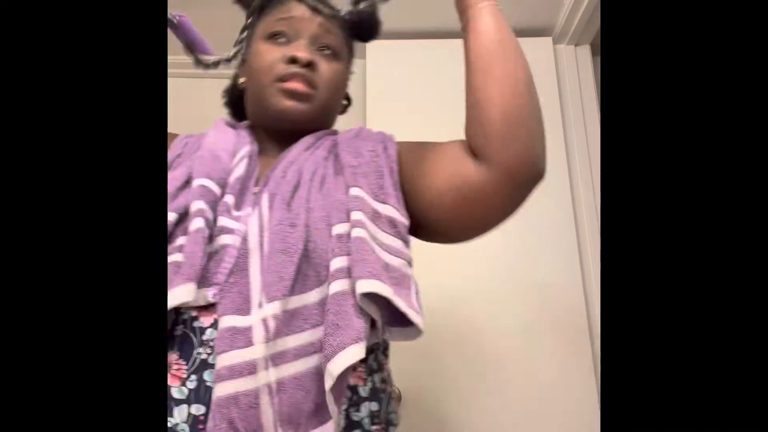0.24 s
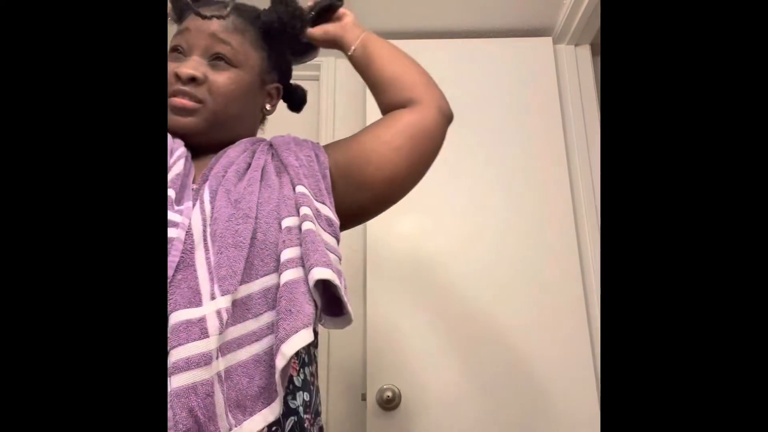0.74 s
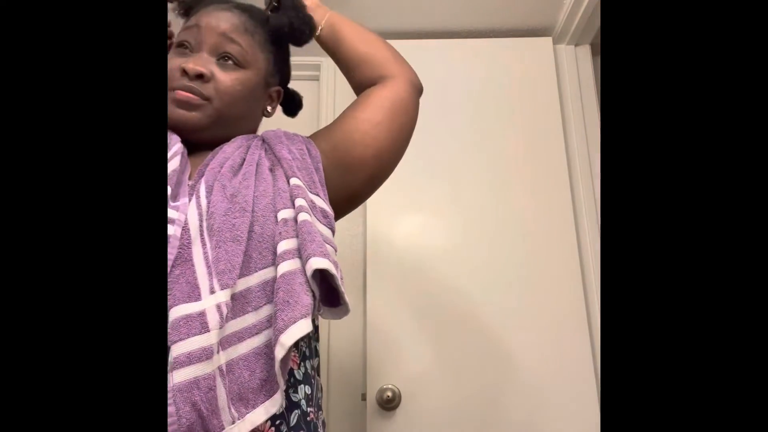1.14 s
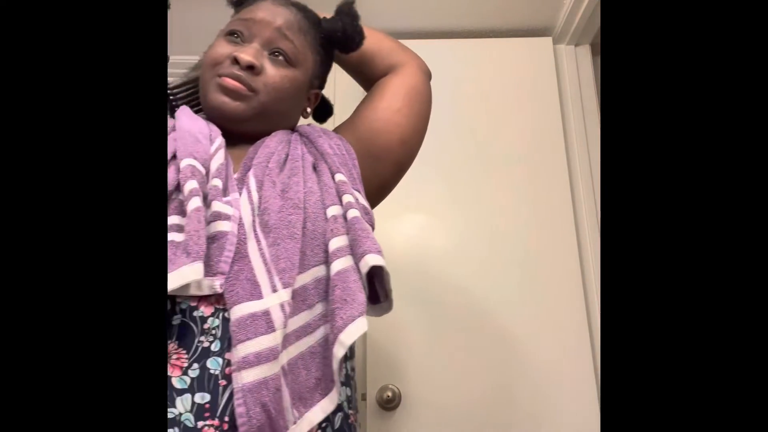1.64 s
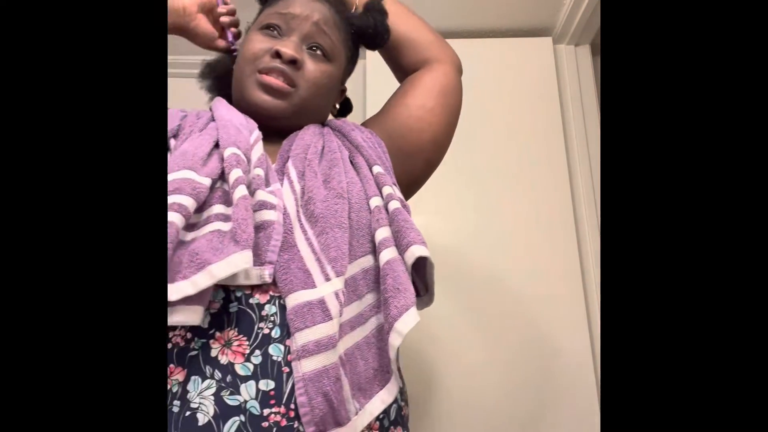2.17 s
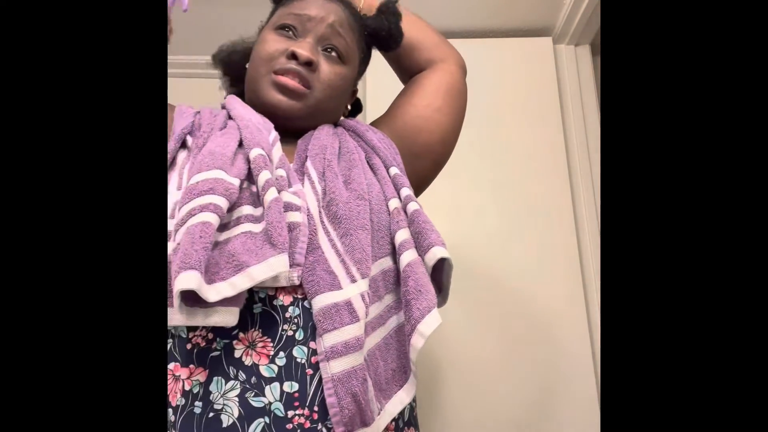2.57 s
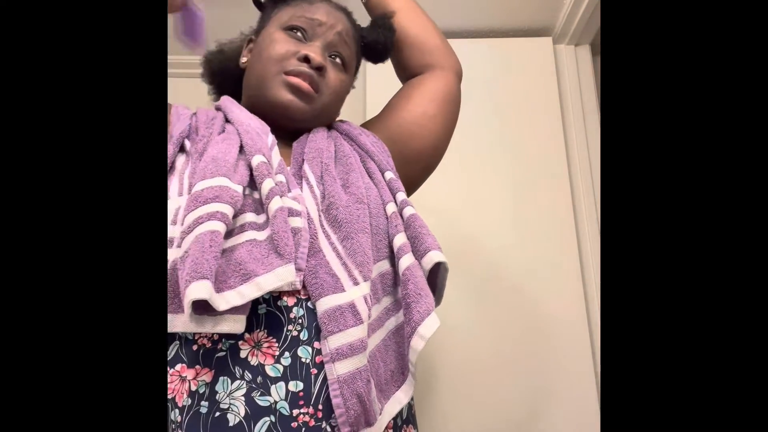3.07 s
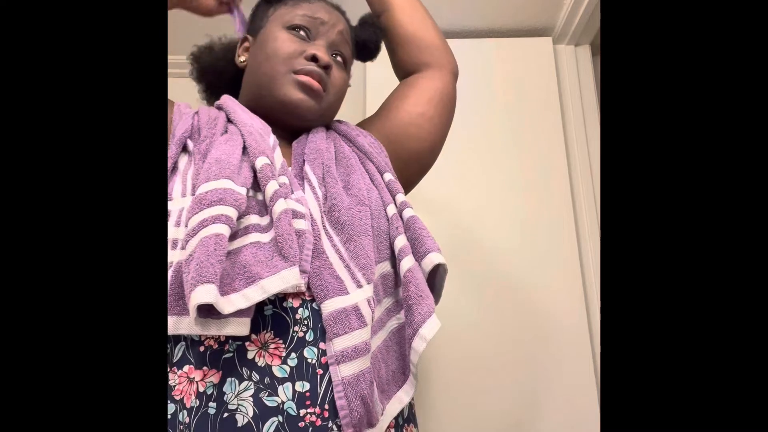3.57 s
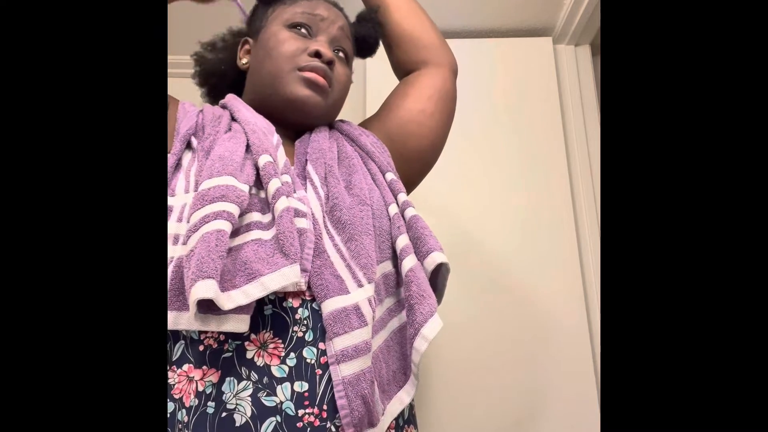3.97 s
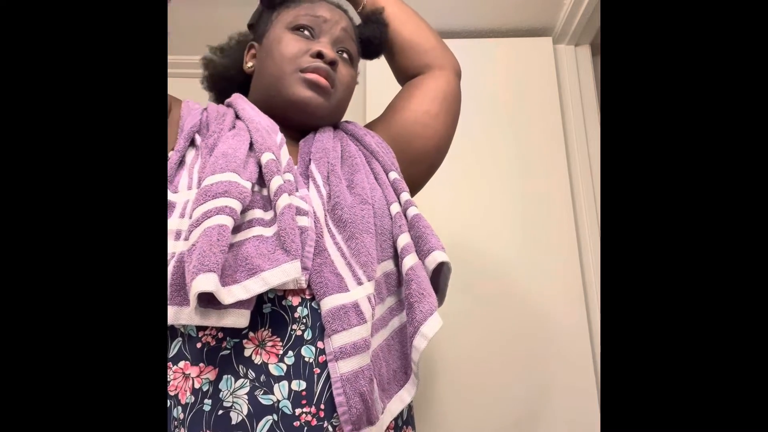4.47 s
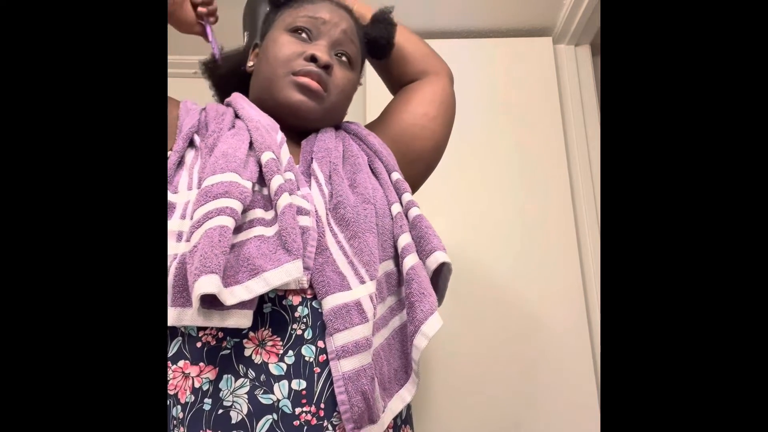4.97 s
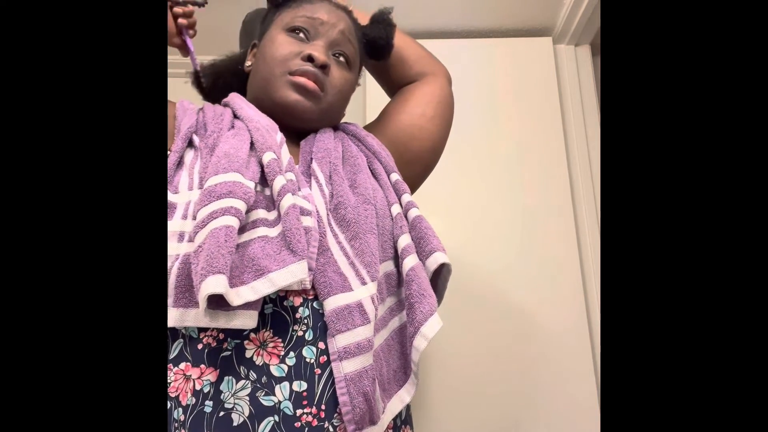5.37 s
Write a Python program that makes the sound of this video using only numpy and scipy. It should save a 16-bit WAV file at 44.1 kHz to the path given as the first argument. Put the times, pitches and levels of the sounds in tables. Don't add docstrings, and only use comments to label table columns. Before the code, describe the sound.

Close hair dryer noise opens with a loud near sweep, then rushing air and a wavering, near-constant-pitch whine ring off hard walls.

```python
import sys
import numpy as np
from scipy import signal
from scipy.fft import rfft, irfft, next_fast_len
from scipy.io import wavfile
from scipy.ndimage import uniform_filter1d, map_coordinates

SR = 44100
rng = np.random.default_rng(int(sys.argv[2]) if len(sys.argv) > 2 else 0)


def put_to_file(sound):
    columns = np.atleast_2d(sound).T
    safe = np.clip(columns, -1, 1)
    whole_steps = np.round(safe * 32767)
    wavfile.write(sys.argv[1], SR, whole_steps.astype(np.int16))


def ratio_of_db(decibels):
    return 10 ** (np.asarray(decibels, float) / 20)


N = 247842
M = next_fast_len(N + 8192)
HZ = np.fft.rfftfreq(M, 1 / SR)
SIDES = np.array([[1], [-1]])


def along(points):
    hz, value = np.transpose(points)
    return np.interp(np.log(HZ + 1), np.log(hz + 1), value)


def curves(rows):
    seconds, *columns = np.transpose(rows)
    return [np.interp(np.arange(N) / SR, seconds, column) for column in columns]


def wobble(rate):
    coarse = np.arange(0, N + 128, 128)
    knots = rng.standard_normal(int(N * rate / SR) + 4)
    return np.interp(np.arange(N), coarse, map_coordinates(knots, [coarse * rate / SR]))


def white():
    return rfft(rng.standard_normal(N), M) * np.sqrt(SR / 2)


def ringing(modes):
    ring = 0
    for k, (centre, width, left_db, right_db, lead) in enumerate(modes):
        port = ratio_of_db([[left_db], [right_db]]) * np.exp(.5j * SIDES * lead)
        resonance = 1j * HZ * width / (centre * centre - HZ * HZ + 1j * HZ * width)
        ring = ring + port * (-1) ** k * resonance
    return irfft(ring * white(), M)[:, :N]


def rush(spectrum):
    # (frequency [Hz], correlation [0-1])
    likeness = [(40, 0.99), (200, 1), (330, 0.71), (500, 1), (800, 0.19), (1150, 0.15), (1550, 0.35),
                (1750, 1), (2300, 0.8), (2700, 0.45), (3200, 0.12), (4500, 0.15), (5500, 1), (7300, 0.58),
                (8300, 1), (10200, 0.91), (11300, 0.64), (12600, 0.9)]
    # (frequency [Hz], left lead [rad])
    port_lead = [(250, 0), (480, -0.2), (650, -0.1), (1000, 1.5), (1450, -0.5), (1700, -1), (2200, -2.19),
                 (3000, -3), (4500, -4), (6200, -5.5), (7600, -2.5), (8400, -3.5), (10200, -3), (12300, -1),
                 (12700, 0.5)]
    # (frequency [Hz], left over right [dB])
    shading = [(200, 0), (330, 1.5), (500, 3), (900, 0), (1300, 5.5), (1800, 10.5), (2100, 4.5),
               (2400, 1.5), (3000, 4), (4200, 1.5), (5500, 0), (16000, 0)]
    turn = np.arccos(np.clip(along(likeness), 0, 1)) / 2
    pair = np.cos(turn) * white() + SIDES * np.sin(turn) * white()
    ports = np.exp(.5j * SIDES * along(port_lead)) * ratio_of_db([0 * HZ, -along(shading)])
    return irfft(pair * ports * ratio_of_db(along(spectrum)), M)[:, :N]


def standing_waves(x):
    shared_db, own_db, broad_db = 1.34, 1.76, 0.77
    hz, _, z = signal.stft(x, SR, nperseg=1024)
    noise = rng.standard_normal((4,) + z.shape[1:])
    narrow = uniform_filter1d(noise[:3], size=2, axis=1)
    narrow = uniform_filter1d(narrow, size=20, axis=2)
    narrow = uniform_filter1d(narrow, size=12, axis=2)
    broad = uniform_filter1d(noise[3], size=8, axis=0)
    broad = uniform_filter1d(broad, size=7, axis=1)
    narrow, broad = narrow / narrow.std(), broad / broad.std()
    apart = np.clip(hz / 600, 0, 1)[:, None] ** 2
    lift = shared_db * narrow[0] + own_db * apart * narrow[1:] + broad_db * broad
    return signal.istft(z * ratio_of_db(lift), SR, nperseg=1024)[1][:, :N]


def room_roar(near, place, height):
    # (frequency [Hz], level [dB per Hz])
    body = [(20, -95), (40, -76), (60, -70.5), (110, -70.5), (210, -76.5), (310, -79), (450, -65.5),
            (650, -63), (900, -67.5), (1100, -67.5), (1350, -67), (1600, -65.5), (1900, -64), (2300, -120)]
    # (frequency [Hz], width [Hz], left level [dB], right level [dB], left lead [rad])
    room_modes = [(72.6, 15, -66.5, -66.5, 0), (116.6, 9.8, -63.5, -63, 0), (156.5, 11, -62.5, -62.5, 0),
                  (259.5, 11.1, -61.5, -60.5, -0.37), (358.5, 18, -63.5, -63.5, 0.46),
                  (546.3, 15.5, -55.5, -73, -1.05), (1198, 18, -71, -64.5, -3),
                  (2205, 33, -58.5, -67.5, -2.5)]
    # (frequency [Hz], width [Hz], left level [dB], right level [dB], left lead [rad])
    lower_modes = [(727.4, 11.7, -56, -66, 1.5), (810, 18, -54.5, -64, -2), (866, 12, -60.5, -70, -3)]
    # (frequency [Hz], width [Hz], left level [dB], right level [dB], left lead [rad])
    upper_modes = [(914, 15.7, -59, -57.5, .2), (986, 18, -65, -61, 1.6)]
    low = ratio_of_db(0.14 * place + 0.14 * height) * (rush(body) + ringing(room_modes))
    low += ratio_of_db(1.2 * height + .5 * wobble(3.7)) * ringing(lower_modes)
    low += ratio_of_db(.1 * near + 0.92 * place) * ringing(upper_modes)
    return low


def hiss(near):
    # (frequency [Hz], level [dB per Hz])
    turbulence = [(3500, -120), (4100, -74), (4600, -73), (5500, -77), (6800, -77), (8000, -83.5),
                  (10000, -82.5), (12000, -86.5), (12500, -89), (14000, -91), (15700, -90.5), (17000, -100)]
    return ratio_of_db(1.13 * near) * rush(turbulence)


def jet_and_grille(near, aim, lift_db, sweep):
    # (frequency [Hz], level [dB per Hz])
    jet = [(1200, -120), (1550, -79), (1720, -66.5), (1900, -70), (2050, -60), (2300, -62), (2480, -73.5),
           (2800, -120)]
    # (frequency [Hz], level [dB per Hz])
    grille = [(2000, -120), (2300, -65), (2500, -63.5), (2850, -65.5), (3050, -69), (3500, -67),
              (4000, -70.5), (4500, -79), (5200, -120)]
    jet_db = 0.57 * near + .15 * aim + 0.17 * lift_db + 6 * sweep + 0.88 * wobble(11)
    return ratio_of_db(jet_db) * rush(jet) + ratio_of_db(.6 * near + 0.038 * aim) * rush(grille)


def nozzle_whistle(near, aim, sweep):
    # (frequency [Hz], width [Hz], left level [dB], right level [dB], left lead [rad])
    nozzle_modes = [(1767, 60, -57.5, -68, -1.4), (1829, 48, -54.5, -63.5, -1.4),
                    (1900, 33, -53, -69, -1.54)]
    whistle_db = .1 * near + 1.32 * aim - 1.5 * sweep + 1.5 * wobble(18)
    return ratio_of_db(whistle_db) * ringing(nozzle_modes)


def airflow(lift_db):
    # (time [s], nearness [dB], nozzle aim [dB], left-right [dB], place among the walls [dB])
    hand = [(0, -42.5, 12, 5, -42), (.12, -41.5, 6, 6.5, -49.5), (.35, -43.5, 1.5, 7, -49),
            (.8, -46.5, 2.5, 6.5, -46), (1.05, -46, 0, 8, -41.5), (1.3, -47, -5, 6.5, -49.5),
            (1.75, -47, -0.5, 6, -53), (1.88, -46, -0.5, 4.5, -42), (2.1, -45.5, -0.5, 8, -48),
            (2.3, -48, 5, 5, -45), (2.75, -44.5, 4, 5.5, -45.5), (3.55, -43.5, 5, 7, -45),
            (4.06, -44.5, 4.5, 7, -48), (4.2, -45, -3, 5.5, -45.5), (4.67, -44, 6, 6, -49),
            (4.86, -44, -2, 6.5, -39.5), (5.1, -45, 1.5, 8, -40), (5.62, -45, 4.5, 5, -40.5)]
    # (time [s], drive of the lower modes [dB])
    held_height = [
        (0, -40.5),
        (.9, -40.5),
        (1.1, -41.5),
        (1.75, -42),
        (3.55, -47.5),
        (4.41, -40),
        (4.98, -44.5),
        (5.31, -43.5),
        (5.62, -41.5),
    ]
    near, aim, pan, place, height = (c - c.mean() for c in curves(hand) + curves(held_height))
    sweep_s = .28
    sweep = np.exp(-(np.arange(N) / SR / sweep_s) ** 4)
    swing = ratio_of_db(SIDES * pan * 1.2)
    air = room_roar(near, place, height) + swing * jet_and_grille(near, aim, lift_db, sweep) + hiss(near)
    return swing * nozzle_whistle(near, aim, sweep) + standing_waves(air)


def tone(angle, left_db, right_db, lead):
    level = ratio_of_db(np.array([left_db, right_db]).reshape(2, -1))
    return np.sqrt(2) * level * np.sin(angle + rng.uniform(0, 2 * np.pi) + SIDES * lead / 2)


def holds(order, *tables):
    stray = {4: (-45, -44.5), 8: (-50, -43.5), 12: (-53, -54), 2: (-46, -45.5)}
    fade_s = .014
    t, both, busy = np.arange(0, N + 64, 64) / SR, 0, 0
    for rows, *shared_lead in tables:
        start, length, left_db, right_db, *own_lead = np.transpose(rows)[..., None]
        lead = (own_lead or shared_lead)[0]
        rise = 1 + np.tanh((t - start) / fade_s / 2)
        fall = 1 + np.tanh((start + length - t) / fade_s / 2)
        gate = rise * fall / 4
        ports = ratio_of_db([left_db, right_db]) * gate * np.exp(.5j * SIDES[..., None] * lead)
        both = both + ports.sum(axis=1)
        busy = busy + gate.sum(axis=0)
    left, right, busy = (np.interp(np.arange(N) / SR, t, v) for v in (*both, busy))
    wander = np.array([ratio_of_db(db + 2 * wobble(9)) * np.exp(1.5j * wobble(7)) for db in stray[order]])
    return np.array([left, right]) + np.clip(1 - busy, 0, 1) * wander


def held(angle, strength, shake_db, rate):
    shake = ratio_of_db(shake_db * np.array([wobble(rate), wobble(rate)]))
    return np.sqrt(2) * shake * (strength * np.exp(1j * angle)).imag


def whine_holds():
    # (time [s], length [s], left level [dB], right level [dB])
    facing = [(-.1, 0.23, -32, -31.5), (.1, 0.093, -25, -28), (.22, 0.059, -22, -27), (.39, .04, -31, -34),
              (.51, 0.037, -24.5, -29), (.68, 0.055, -32, -35), (.91, 0.071, -28, -34),
              (1.1, .55, -31.5, -34), (1.65, 0.35, -26.5, -36), (.57, 0.11, -36, -41), (2.2, .25, -31, -35),
              (2.45, 0.27, -35.5, -43), (2.72, .1, -30, -35.5), (2.82, .34, -26.5, -30.5),
              (3.16, .98, -27.5, -31.5), (4.66, 0.095, -31, -32), (4.98, 0.18, -26, -29.5),
              (5.17, 0.31, -24, -30), (5.47, .2, -27, -33)]
    # (time [s], length [s], left level [dB], right level [dB])
    turned = [
        (4.25, 0.39, -35, -33.5),
        (4.82, 0.076, -29, -28.5),
    ]
    return holds(8, [facing, -2.05], [turned, -3.2])


def fan_tones(whine):
    # (time [s], shaft rate [turns per second])
    shaft = [(0.0, 294.4), (0.4, 294.8), (0.8, 295.44), (1.2, 295.48), (1.6, 295.17), (2.4, 295.45),
             (2.8, 295.44), (3.6, 295.15), (4.4, 295.3), (5.2, 295.82), (5.6, 295.74)]
    # (time [s], length [s], left level [dB], right level [dB], left lead [rad])
    blade = [(-.1, 0.16, -20, -27.5, 2.5), (.09, 0.11, -31.5, -31.5, 3.1), (.2, .13, -25, -33.5, 5.3),
             (.36, .11, -32.5, -26.5, 9.5), (.48, 0.083, -30, -41, 10.6), (.6, 0.17, -27.5, -32, 10.4),
             (.815, 0.13, -34.5, -30, 11.3), (.97, 0.42, -34.5, -36, 10.67),
             (1.36, 0.38, -27.5, -27.5, 10.22), (1.9, .32, -29.5, -37.5, 9.3), (2.22, 0.47, -27.5, -46, 8),
             (2.76, 0.11, -34.5, -39.5, 6.6), (2.9, .17, -41, -49, 5.3), (3.08, 0.26, -39, -38.5, 6.3),
             (3.41, .24, -37.5, -37.5, 6), (3.66, .13, -42, -43, 7), (3.8, 0.32, -34.5, -37, 6.6),
             (4.19, 0.33, -35.5, -38.5, 9.3), (4.5, 0.074, -35, -42, 8.8), (4.58, 0.21, -35, -43, 7.2),
             (4.85, 0.085, -34, -32, 9.3), (4.94, .75, -29.5, -34.5, 7.9)]
    # (time [s], length [s], left level [dB], right level [dB], left lead [rad])
    third = [(-.05, 0.23, -44, -43, -.5), (.26, 0.062, -37, -37, 0.5), (.41, 0.12, -42, -43, 0.5),
             (.635, 0.082, -39, -38, -0.5), (.8, .07, -36, -55, 4.5), (.96, 0.18, -47, -39.5, .5),
             (1.93, 0.056, -33, -51.5, 2.6), (2.67, .06, -36, -39, 5.2), (3.62, 0.32, -43.5, -49, 7),
             (4.12, 0.42, -45, -38.5, 9), (4.87, 0.19, -40, -42.5, 11)]
    # (time [s], length [s], left level [dB], right level [dB])
    hum = [
        (.27, 1.48, -45, -44.5),
        (1.71, 0.89, -40, -46),
        (2.69, 0.6, -42.5, -47.5),
        (3.49, 1.33, -45, -47.5),
        (4.63, .08, -36.5, -40.5),
        (4.72, .29, -42.5, -47),
        (5.09, 0.42, -39, -43.5),
    ]
    # (multiple of shaft, left level [dB], right level [dB], left lead [rad])
    weak_orders = [
        (1, -55, -64, 1),
        (5, -48, -47, 3.5),
        (6, -45.5, -49, 1),
        (7, -43.5, -42, -2.2),
        (16, -56.5, -53, -2),
        (20, -55, -56, -4.5),
    ]
    angle = 2 * np.pi * np.cumsum(curves(shaft)[0] + .15 * wobble(6)) / SR
    tones = held(4 * angle, holds(4, [blade]), shake_db=.8, rate=9)
    tones += held(8 * angle, whine, shake_db=1.1, rate=12)
    tones += held(12 * angle + .8 * wobble(10), holds(12, [third]), shake_db=2, rate=14)
    tones += held(2 * angle + 1.2 * wobble(13), holds(2, [hum, .1]), shake_db=2.5, rate=14)
    for order, left_db, right_db, lead in weak_orders:
        left_db, right_db = left_db + 2.5 * wobble(6), right_db + 2.5 * wobble(6)
        tones += tone(order * angle + .7 * wobble(9), left_db, right_db, lead + .8 * wobble(2.5))
    return tones


def scene():
    whine = whine_holds()
    lift_db = 20 * np.log10(uniform_filter1d(np.abs(whine[0]), size=4000) + 1e-3)
    return airflow(lift_db - lift_db.mean()) + fan_tones(whine)


def roll_off(x):
    return signal.sosfilt(signal.butter(12, 15750, fs=SR, output="sos"), x)


def record(dry):
    return roll_off(dry)


dry = scene()
out = record(dry)
put_to_file(out)
```